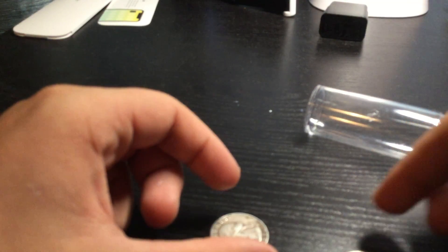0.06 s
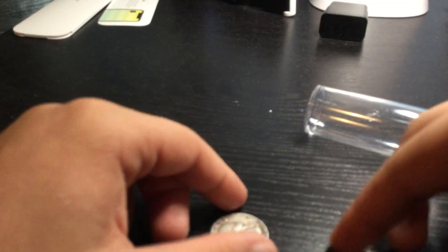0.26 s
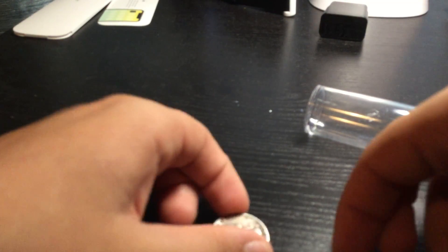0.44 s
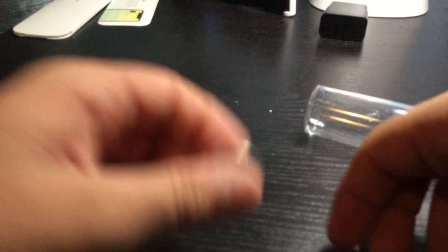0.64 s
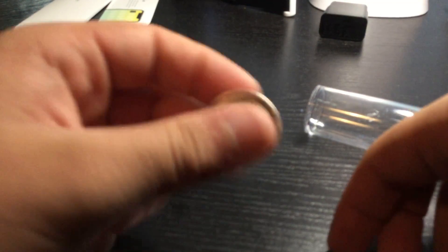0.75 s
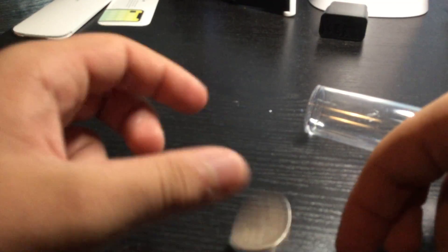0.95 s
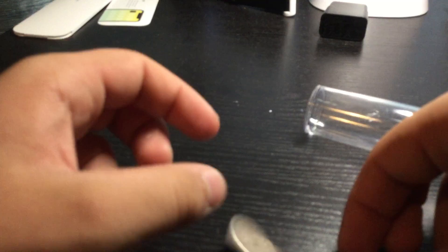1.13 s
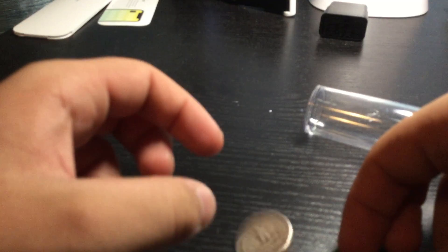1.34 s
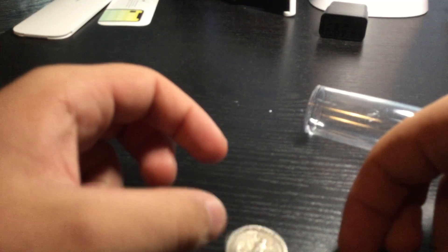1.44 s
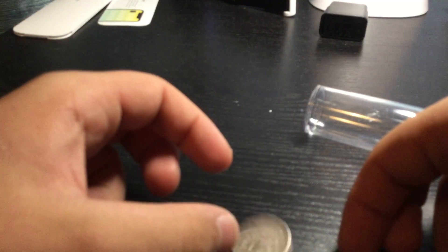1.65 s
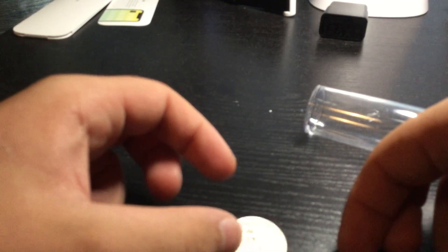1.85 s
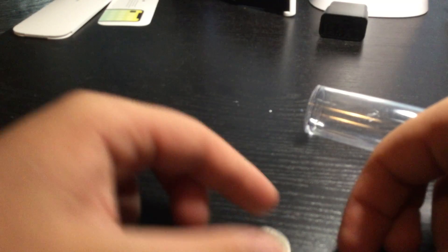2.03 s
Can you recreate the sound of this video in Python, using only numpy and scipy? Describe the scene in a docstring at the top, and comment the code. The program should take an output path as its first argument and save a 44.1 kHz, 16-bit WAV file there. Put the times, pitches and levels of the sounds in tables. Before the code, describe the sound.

A metal coin wobbles to rest on a hard desk, then another drops, bounces and rolls

```python
"""A quiet room and a hard desk, heard close, with faint reflections and a low hum underneath.
A coin wobbles ever faster and settles; fingers brush the desk and pick it up with two small taps.
A second coin is dropped, bounces, and rolls round on its milled rim. Each contact chatters into the
resonant desk top and, unless the coin is flat or held, restrikes its high ring; the drop jolts the desk.
"""
import sys
import numpy as np
from scipy import signal
from scipy.io import wavfile
from scipy.ndimage import uniform_filter1d

SR = 44100
rng = np.random.default_rng(int(sys.argv[2]) if len(sys.argv) > 2 else 0)


def materialize(psi):
    """Save the field psi as 16-bit PCM at rate SR to the path in sys.argv[1].

    A 1-D psi becomes a single channel; in a 2-D psi each row is a channel.
    """
    bounded = np.clip(np.atleast_2d(psi).T, -1, 1)
    quanta = np.round(bounded * 32767).astype(np.int16)
    wavfile.write(sys.argv[1], SR, quanta)


N = 92124  # samples
SWAP_S = 0.9  # contacts after this belong to the second coin

# Sharp contacts of rim and desk: start_s, level_db, chatter_s, fall_s (time constant), then relative
# to level_db: blow_db (opening blow), bass_db, low_mid_db, mid_db, high_mid_db, treble_db, top_db,
# lower_ring_db, upper_ring_db
KNOCKS = [(0.014, -21, 0.0016, 0.0059, -11, -12.5, -16.5, 0.5, -1.5, -2.5, -13, -22, -29),
          (0.071, -20, 0.0026, 0.0054, 2, -4, -9.5, 1.5, -1.5, -4.5, -17, -24.5, -48),
          (0.125, -18, 0.0037, 0.0054, 9, -10, -10.5, 0.5, 1.5, -4.5, -21, -30.5, -48),
          (0.174, -17, 0.0015, 0.0035, 9, -8, -8, 2, 2.5, -5, -18, -41, -48),
          (0.217, -19, 0.0049, 0.0036, 2.5, -8, -15.5, 2, 3, -4, -14, -37, -49.5),
          (0.259, -14, 0.0044, 0.0042, -1, -7.5, -13.5, -1, 0, -3.5, -16, -25, -51.5),
          (0.294, -12, 0.0034, 0.0047, -4, -6.5, -9.5, -1.5, 1.5, -5.5, -16.5, -24, -48),
          (0.325, -15, 0.003, 0.0035, -5, -6, -8.5, 0, -0.5, -3.5, -18.5, -35.5, -51),
          (0.349, -26, 0.0034, 0.0041, 0, -6.5, -9.5, 0.5, 1.5, 0, -17, -45, -53),
          (0.372, -22, 0.002, 0.0021, 12.5, -14, -10.5, 0.5, 2, -6, -15.5, -27, -54),
          (0.389, -23.5, 0.0028, 0.0035, 12, -5.5, -15.5, 4, 3.5, 0, -18, -29, -45),
          (.3815, -29.5, 0.0012, 0.0027, -4, -14, -14, 4, 5, -0.5, -14, -45, -52),
          (.3995, -23, 0.0052, 0.0028, -6, -6, -2, -6, 1.5, -17.5, -31, -60, -60),
          (0.648, -30, 0.0025, 0.0043, 1.5, -2, 2, 0, 0, -13, -32, -57, -62.5),
          (0.698, -21.5, 0.0018, 0.0032, 2.5, -1.5, 5, -12, -5.5, -10, -32, -60, -60),
          (1.0017, -5.5, 0.0043, 0.0036, 6.5, -31, 2, 3.5, 5.5, 1, 0, -8, -53.5),
          (1.0047, -1, 0.0026, 0.0015, -1, -35, -6.5, 0.5, -3.5, -4, -12, -26, -31.5),
          (1.118, -2.5, 0.002, 0.0024, 6, -3.5, -2, -0.5, 0, -6, -7, -27, -51),
          (1.127, -2, 0.0021, 0.003, 11.5, -6.5, -4, -4.5, -7, -6, -29, -27, -53),
          (1.14, -10.5, 0.0013, 0.0018, 4, -2.5, -10.5, 3, 4, 0.5, -22, -18.5, -46),
          (1.181, -9, 0.00069, 0.0015, 13, -4, -0.5, -4.5, -7, -14, -37, -24, -46),
          (1.211, -18, 0.0012, 0.0021, -3, -0.5, -4, 2.5, 2, 1, -27, -17, -46),
          (1.226, -11.5, 0.001, 0.002, 12, -5.5, -1, -4, -3.5, -5.5, -35, -25, -43),
          (1.232, -14, 0.00067, 0.00095, 8, 2, 1.5, -4, -13, -6, -25, -26, -43),
          (1.237, -12, 0.0011, 0.0015, -2, -15, -4, -9, -5.5, -3.5, -22, -23, -42),
          (1.244, -20, 0.00089, 0.0017, 12, -10, 2.5, 4, 6, -3, -25.5, -26, -38)]


def amp(db):
    """Amplitude ratio of a level in dB."""
    return 10 ** (np.asarray(db, float) / 20)


def evened(x):
    """Signal scaled to an RMS of one."""
    return x / np.sqrt(np.mean(x ** 2) + 1e-20)


def read(points, hz):
    """Value of a (Hz, value) curve, interpolated along log frequency."""
    point_hz, value = np.transpose(points)
    return np.interp(np.log(hz + 1), np.log(point_hz + 1), value)


def causal(gain):
    """Minimum-phase impulse response of a gain on an rfft axis."""
    mirrored = np.r_[gain, gain[-2:0:-1]]
    log_gain = np.log(np.maximum(mirrored, 1e-5))
    spectrum = np.exp(np.conj(signal.hilbert(log_gain)))
    return np.fft.ifft(spectrum).real[:len(gain)]


def hum():
    """Quiet low room noise: random spectral frames under a fixed colour, slightly patchy."""
    # Colour of the room noise before levelling: pitch_hz, relative_density_db (per Hz)
    colour = [(15, -81), (25, -30.5), (170, -16), (249, -11.5), (293, -20), (416, -14.5), (575, -42),
              (677, -34), (962, -65.5), (1160, -37.5), (16000, -101.5)]
    level_db, patch_db = -61.5, 0.5  # overall RMS level, RMS patchiness
    frames, hz = N // 256 + 5, np.fft.rfftfreq(1024, 1 / SR)
    real, imaginary, patches = rng.standard_normal((frames, 513, 3)).T
    patches = uniform_filter1d(patches, 8, 0)  # across frequency
    patches = evened(uniform_filter1d(patches, 10, 1))  # across time
    spectrum = (real + 1j * imaginary) * amp(read(colour, hz)[:, None] + patch_db * patches)
    noise = signal.istft(spectrum, nperseg=1024, noverlap=768)[1][:N]
    return amp(level_db) * evened(noise)


def room(x):
    """Sparse random reflections, each band dying at its own speed."""
    # Decay of the room: pitch_hz, t60_s
    decay = [(300, 0.24), (1500, 0.26), (5000, 0.14), (12000, 0.11)]
    level_db = -19  # of the unit-energy tail
    taps = np.zeros(SR // 2)
    slots = np.arange(200, len(taps) - 20, 20)  # one reflection in every 20 samples
    taps[slots + rng.integers(0, 20, len(slots))] = rng.choice([-1., 1.], len(slots))
    hz, t, spectrum = signal.stft(taps, SR, nperseg=256)
    fading = amp(-60 * t / read(decay, hz)[:, None])
    tail = signal.istft(spectrum * fading, SR, nperseg=256)[1]
    return amp(level_db) * signal.fftconvolve(x, tail / np.linalg.norm(tail))[:N]


def rustle():
    """Faint bright brushing of fingers on the desk: high-passed noise under a level curve."""
    # Strength of the brushing noise ahead of its high-pass: time_s, level_db
    brushing = [(0.42, -74), (0.584, -102), (0.654, -79), (0.668, -88), (0.704, -65), (0.716, -71.5),
                (0.86, -101)]
    time_s, level_db = np.transpose(brushing)
    level = amp(np.interp(np.arange(N) / SR, time_s, level_db, -120, -120))
    b, a = signal.butter(2, 3000, "high", fs=SR)
    return level * signal.lfilter(b, a, rng.standard_normal(N))


def thumps():
    """The whole desk jolts under the drop and its bounce: a low sine that dies exponentially."""
    # Desk jolts: start_s, level_db
    jolts = [(1.004, -13.5), (1.121, -31), (1.128, -59)]
    pitch_hz, t60_s = 79.7, 0.037
    t, out = np.arange(SR // 4) / SR, np.zeros(N + SR)
    for start_s, level_db in jolts:
        first = round(start_s * SR)
        out[first:first + len(t)] += amp(level_db - 60 * t / t60_s) * np.sin(2 * np.pi * pitch_hz * t)
    return out[:N]


def contacts():
    """All contacts in time order: each rises to a peak, holds, falls, and leaves a dragging rim."""
    # Softer passes of the rolling rim: start_s, length_s, level_db (ahead of roll_lift_db),
    # rise_share (of length_s), hold_s, fall_s (time constant), drag_db (relative to the peak),
    # then the eight band and ring columns of KNOCKS
    rolls = [(1.327, 0.041, -27, 0.36, 0.0027, 0.0073, -23.5, -9, -3.5, -3.5, -3, -12, -15.5, -38, -54),
             (1.412, 0.03, -32, 0.27, 0.0026, 0.015, -7, -7, -2.5, -2.5, -3, -12.5, -26, -38, -56),
             (1.499, 0.034, -30, 0.38, 0.0066, 0.0077, -36, -9, -3.5, -2, -3.5, -11, -22.5, -50, -61),
             (1.582, 0.036, -33, 0.4, 0.0027, 0.013, -34, -10.5, 0, -1.5, -1, -10, -21, -40.5, -59),
             (1.666, 0.034, -35, 0.33, 0.0073, 0.011, -19, -7, -1.5, -1.5, -1.5, -14, -23, -55, -58),
             (1.74, 0.04, -31, 0.35, 0.0045, 0.0062, -30, -10.5, -2, -4, -2, -11, -22, -38, -61),
             (1.816, 0.029, -27, 0.37, 0.0031, 0.005, -14, -6.5, -2.5, -3, -2.5, -11, -20.5, -54, -61),
             (1.887, 0.031, -32, 0.36, 0.0054, 0.015, -20, -6.5, -1, -2.5, -2, -12, -27, -43, -59),
             (1.958, 0.025, -33, 0.29, 0.0084, 0.0086, -23, -9.5, -1, -3, -1.5, -13, -25.5, -46, -60),
             (2.025, 0.025, -31, 0.31, 0.0026, 0.012, -15.5, -12, -2, -3.5, -3, -14.5, -27, -39, -56)]
    # Short rise into each knock, relative to its peak: level_db reached just before the peak, for the wobbling
    # and the dropped coin
    knock_rise_db = [-10, -8]
    knock_rise_s, knock_drag_db, knock_drag_s = 0.0047, -16.5, 0.023  # both times are time constants
    roll_lift_db, roll_drag_s = 15.5, 0.044
    # rows: peak_s, level_db, rise_s, rise_db, hold_s, fall_s, drag_db, drag_s, bands_db, rings_db
    rows = []
    for start, db, hold, fall, _, *colour in KNOCKS:
        rise_db = knock_rise_db[int(start > SWAP_S)]
        rows.append((start, db, knock_rise_s, rise_db, hold, fall, knock_drag_db, knock_drag_s,
                     colour[:6], colour[6:]))
    for start, length, db, share, hold, fall, drag_db, *colour in rolls:
        rise = share * length
        rows.append((start + rise, db + roll_lift_db, rise / 2, 0, hold, fall, drag_db, roll_drag_s,
                     colour[:6], colour[6:]))
    return sorted(rows, key=lambda row: row[0])


def ring():
    """Each contact resets how strongly the coin's modes ring; lying flat or held, it is mute."""
    # Modes of each coin: pitch_hz, t60_s (ahead of stretch), sign, part (0 lower, 1 upper ring);
    # close pairs start against each other and beat
    first_coin = [(10541, .3, 1, 0), (14643, .3, 1, 1), (6132, .3, 1, 0), (6379, .3, -1, 0)]
    second_coin = [(10792, .45, 1, 0), (14536, 1.5, 1, 1), (14558, 1.5, -1, 1), (6110, .6, 1, 1),
                   (6347, .6, -1, 1)]
    # One list a coin, relative to its contact's ring level: level_db of each mode
    mode_levels = [
        [0, -2, -11, -14.5],
        [3, -1, -6, -4, -3],
    ]
    # Ring time of each coin: stretch (factor)
    stretch = [1.05, 0.8]
    # Contacts between these leave the coin mute: start_s, end_s
    held = (.395, .9)
    # Lower and upper ring keep the drop's phase until then, later contacts restart it: time_s
    free = [1.3, 1.1]
    struck_s, fade_s = 0.998, 0.003  # phase reference of the drop; crossfade between contacts
    rows, out = contacts(), np.zeros(N)
    ends = [row[0] for row in rows[1:]] + [N / SR]
    slips = rng.random((len(rows), 5))  # random phases in turns
    for (peak, db, *_, rings_db), end, slip in zip(rows, ends, slips):
        if held[0] < peak < held[1]:
            continue
        first = 0 if peak == rows[0][0] else round(peak * SR)  # the first ring sounds from the outset
        last = min(round((end + fade_s) * SR), N)
        t, coin = np.arange(last - first) / SR, int(peak > SWAP_S)
        edge = np.clip(np.minimum(t, t[-1] - t) / fade_s, 0, 1)
        modes = [first_coin, second_coin][coin]
        for (hz, t60, sign, part), mode_db, turn in zip(modes, mode_levels[coin], slip):
            if SWAP_S < peak < free[part]:
                turn = 0
            level = amp(db + rings_db[part] + mode_db - 60 * t / (t60 * stretch[coin]))
            cycles = hz * (t + first / SR - struck_s) + turn
            out[first:last] += sign * edge * level * np.sin(2 * np.pi * cycles)
    return out


def pressure():
    """How hard the rim ticks press in each band, summed as power, and the single blows."""
    # Steady rolling ahead of its lumps and band weights: time_s, level_db
    grind = [(0, -50.5), (.2, -61), (.4, -41.5), (.43, -62), (.99, -81), (1.12, -79), (1.26, -45),
             (1.3, -45.5), (1.7, -46.5), (2.09, -44)]
    # Band weights of the steady rolling, bass to top: level_db
    grind_bands_db = [3.5, -2, 0.5, -0.5, -10, -41]
    lump_db, lump_samples = 2, round(0.012 * SR)  # the steady rolling comes in lumps
    t = np.arange(N) / SR
    lumps = uniform_filter1d(rng.standard_normal(N), lump_samples)
    lumps = evened(uniform_filter1d(lumps, lump_samples))
    rolling = amp(np.interp(t, *np.transpose(grind)) + lump_db * lumps)
    power = (rolling * amp(grind_bands_db)[:, None]) ** 2
    for peak, db, rise, rise_db, hold, fall, drag_db, drag, bands_db, _ in contacts():
        before = amp(rise_db) * np.exp(np.minimum(t - peak, 0) / rise)
        since_hold = np.maximum(t - peak - hold, 0)
        after = np.exp(-since_hold / fall) + amp(drag_db) * np.exp(-since_hold / drag)
        shape = np.where(t < peak, before, after)
        power = power + (shape * amp(db - 9.5 + np.array(bands_db))[:, None]) ** 2
    blows = np.zeros_like(power)
    for start, db, _, _, blow_db, *colour in KNOCKS:
        blows[:, round(start * SR)] = amp(db + blow_db + np.array(colour[:6]))
    return np.sqrt(power), blows


def desk():
    """Blows and dense rim ticks ring the desk top band by band."""
    # Colour of the desk top, levelled in each band: pitch_hz, relative_density_db (per Hz)
    colour = [(88, -64), (150, -43), (336, -12), (460, -14), (669, 0.5), (1050, -3.5), (1210, 6),
              (1530, -1), (2500, -5.5), (3350, 3.5), (4100, -9), (5170, -11.5), (6900, -27), (8700, -21),
              (10000, -32), (12000, -36.5), (13500, -38), (15300, -40.5), (16500, -47.5)]
    # Desk top resonances: pitch_hz, width_hz (at half amplitude), level_db (relative to the colour)
    resonances = [(346.6, 60, 6.5), (398, 13, 8.5), (693, 57.6, 4.5), (876, 49, 0.5), (1148, 39, 2),
                  (1572, 27, -3), (1915, 260, 0.5), (2269, 100, 3), (3300, 160, 9), (3700, 360, 5.5),
                  (4097, 150, 8.5), (5440, 120, -0.5), (8550, 140, -6)]
    # Borders between the six bands, bass to top: pitch_hz
    splits = [520, 1000, 2600, 6500, 10500]
    ticks_per_s, tick_spread_db = 5000, 4.0
    even_s = 0.0051  # span over which tick energy evens out
    press, blows = pressure()
    sizes = amp(tick_spread_db * np.minimum(rng.exponential(1, N), 3))
    ticks = sizes * (rng.random(N) < ticks_per_s / SR) * rng.choice([-1., 1.], N)
    ticks = ticks + 0.43 * rng.standard_normal(N)  # fine scrape between ticks
    ticks = ticks / np.sqrt(uniform_filter1d(ticks ** 2, round(even_s * SR)))
    hz = np.fft.rfftfreq(8192, 1 / SR)
    peaks = sum(amp(db) ** 2 / (1 + (2 * (hz - f) / width) ** 2) ** 2 for f, width, db in resonances)
    gain = amp(read(colour, hz)) * np.sqrt(1 + peaks)
    # power share below each border; neighbours differ by one band
    under = [0 * hz] + [1 / (1 + (hz / f) ** 6) for f in splits] + [0 * hz + 1]
    out = np.zeros(N)
    for k in range(len(press)):
        band = np.sqrt(np.maximum(under[k + 1] - under[k], 0))
        response = causal(gain * band)
        response = response / np.linalg.norm(response)
        out += signal.oaconvolve(ticks * press[k] + blows[k], response)[:N]
    return out


def scene():
    """Desk contacts with their reflections, coin ring, jolts, brushing fingers and room hum."""
    knocks = desk()
    return (knocks + room(knocks) + ring() + thumps() + rustle() + hum())[None]


def record(dry):
    """Low cut of the microphone, soft overload and band limit of the recorder."""
    low_cut_hz, ceiling, edge_hz = 45, 1.2, 15800  # ceiling in full scales
    low_cut = signal.butter(4, low_cut_hz, "high", fs=SR, output="sos")
    cut = signal.sosfilt(low_cut, dry)
    soft = ceiling * np.tanh(cut / ceiling)
    band_limit = signal.firwin(511, edge_hz, window=("kaiser", 9), fs=SR)
    return signal.oaconvolve(soft, band_limit[None], "same")


dry = scene()
out = record(dry)
materialize(out)
```